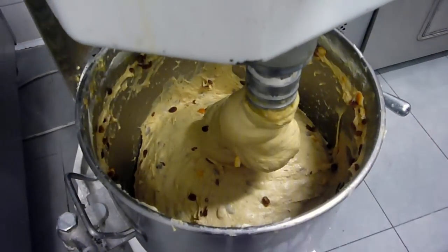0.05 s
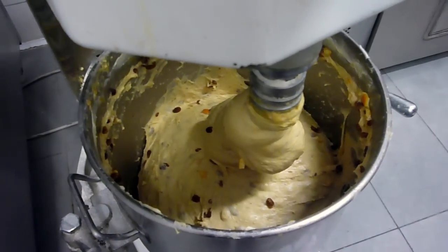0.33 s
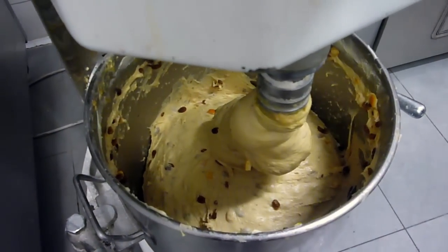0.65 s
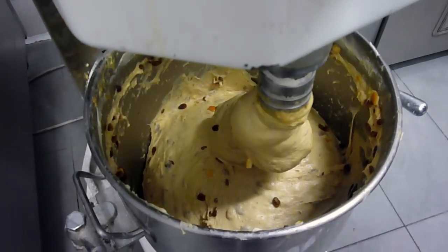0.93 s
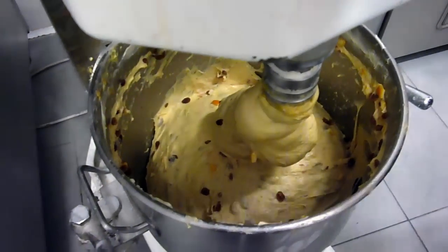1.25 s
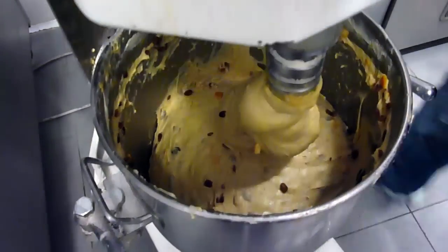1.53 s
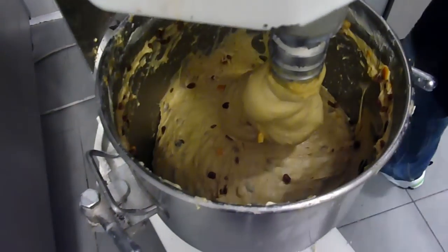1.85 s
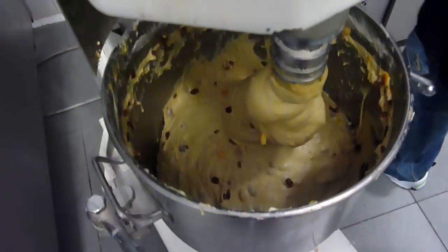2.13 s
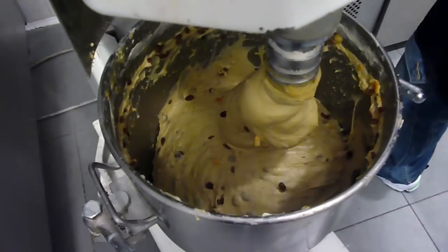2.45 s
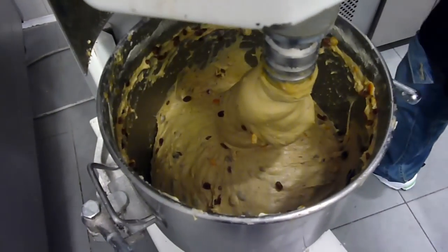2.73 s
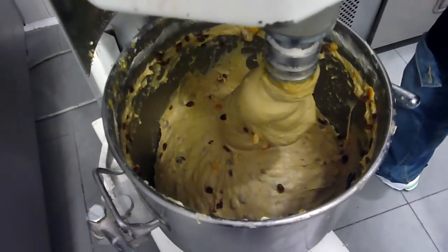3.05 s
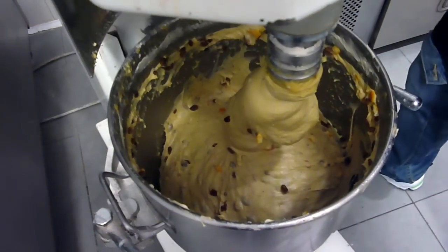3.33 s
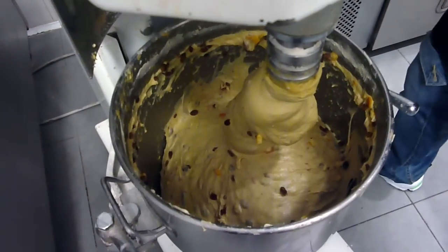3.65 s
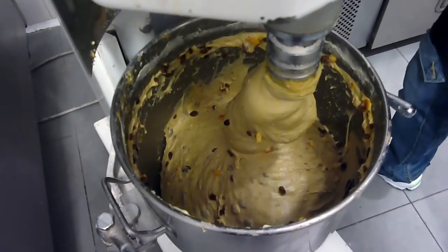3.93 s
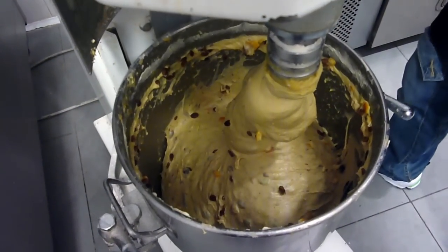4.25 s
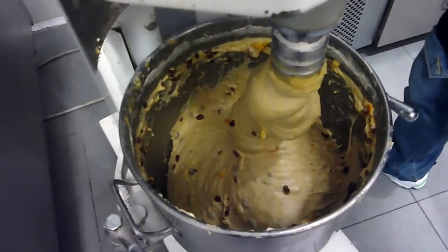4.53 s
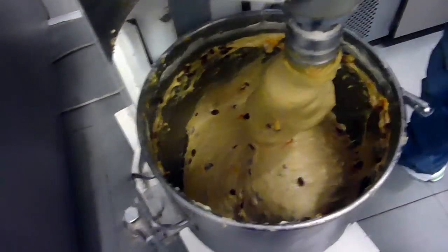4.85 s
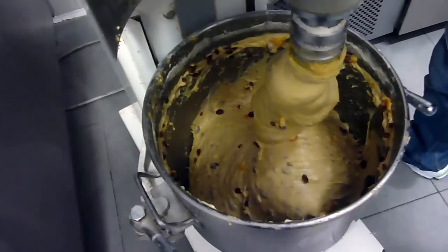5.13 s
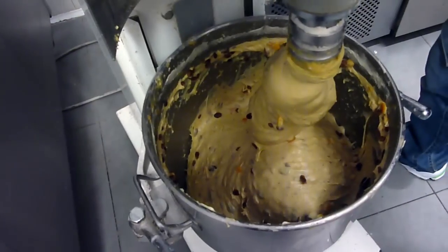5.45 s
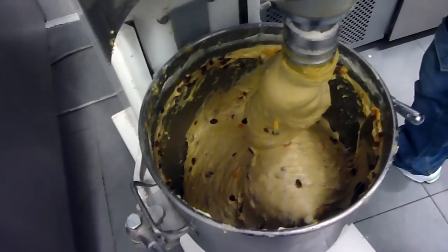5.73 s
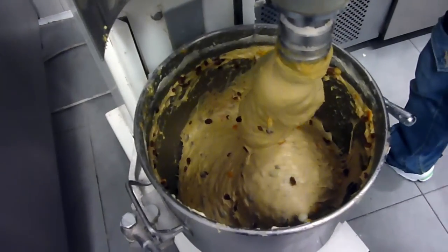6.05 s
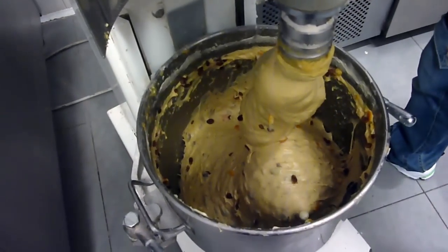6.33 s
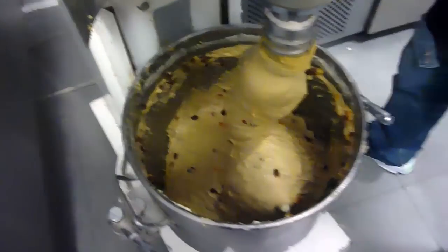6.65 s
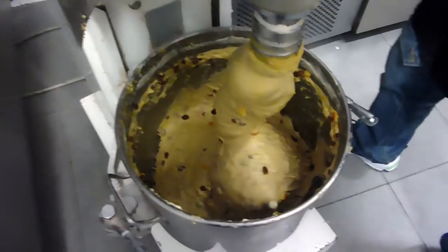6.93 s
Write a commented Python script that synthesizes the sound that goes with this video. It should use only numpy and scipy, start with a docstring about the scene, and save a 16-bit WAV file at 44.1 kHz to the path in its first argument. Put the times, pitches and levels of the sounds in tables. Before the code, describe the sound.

Shoes scuff over a cooler's hum, then a switch clacks and a large dough mixer rumbles, its steel bowl knocking and chattering.

```python
"""Dough mixer in a bakery

Shoes scuff over the hum of a cooler in a tiled kitchen, then a switch clacks and a large mixer starts.
Its gears shake the frame and the steel bowl, its shaft rattles, and blisters burst in the dough.
Under the load of the dough the bowl chatters in its mount, falls quiet for half a second
as the load lets go, and chatters again."""
import sys
import numpy as np
from scipy import signal
from scipy.fft import rfft, irfft
from scipy.io import wavfile
from scipy.ndimage import uniform_filter1d, map_coordinates

SR = 44100
rng = np.random.default_rng(int(sys.argv[2]) if len(sys.argv) > 2 else 0)


def waveform_to_disk(signal):
    """Save audio, clipped to [-1, 1], as 16-bit WAV at the path in sys.argv[1]."""
    frames = np.transpose(np.atleast_2d(signal))
    scaled = np.clip(frames, -1, 1) * 32767
    samples = np.round(scaled).astype(np.int16)
    wavfile.write(sys.argv[1], SR, samples)


N = 317079
T = np.arange(N) / SR
START_S, TURN_S = 1.646, 0.159  # when the mixer starts; how long one turn of its shaft takes

# how hard the drive works against the dough: time_s, level_db
EFFORT = [(1.68, -23), (2.2, -24.5), (2.34, -31), (2.48, -25.5), (2.98, -24), (3.3, -26), (3.75, -25.5),
          (4.16, -23), (4.37, -33), (4.56, -27), (4.82, -15.5), (4.93, -25.5), (5.03, -21), (5.58, -25),
          (5.76, -43), (6.17, -35.5), (6.28, -24), (7.13, -26.5), (7.19, -32.5)]
# how loud the frame rumbles: time_s, level_db
RUMBLE_LEVELS = [(1.68, -15.5), (2.24, -17.5), (2.34, -20.5), (2.75, -20), (2.97, -17.5), (3.33, -19),
                 (3.6, -18), (4.17, -17.5), (4.37, -28.5), (4.6, -19), (4.84, -14.5), (4.93, -23),
                 (5.1, -18), (5.35, -22.5), (5.5, -16.5), (5.78, -40), (6.17, -28.5), (6.27, -21),
                 (6.55, -22.5), (6.92, -17), (7.19, -22)]
# how loud the deep thrum is: time_s, level_db
THRUM_LEVELS = [(1.68, -14.5), (1.9, -30), (2.12, -21.5), (2.3, -29), (2.45, -23.5), (3.15, -28.5),
                (3.45, -24), (3.67, -14.5), (4.35, -25), (4.52, -17), (4.95, -22), (5.62, -22), (5.74, -48),
                (6.0, -34.5), (6.17, -37.5), (6.28, -23), (7.19, -23)]
# how hard the floor shakes: time_s, level_db
SHAKE_LEVELS = [(1.65, -61), (2.7, -46), (3.4, -41.5), (3.62, -33), (4.0, -46), (4.65, -42), (5.75, -61.5),
                (6.1, -47), (7.19, -55)]
# how loud the bearings whine: time_s, level_db
WHINE_LEVELS = [(1.65, -53), (2.05, -54), (3.4, -53), (3.9, -66), (5.8, -72), (7.19, -61)]
# the notes the frame rings at, called its modes: pitch_hz, width_hz, gain_db
FRAME_MODES = [(253.6, 5.6, -2), (273.7, 9.4, 0.5), (295.1, 10.6, -3), (333.3, 12.2, -5), (379.6, 23, -9.5)]
# the notes of the deep thrum: pitch_hz, width_hz, gain_db
THRUM_MODES = [(101.5, 16, -15.5), (138.5, 24, -10.5), (188.8, 6.3, 2), (226, 13.6, -5.5)]
# the notes of the bowl's wall: pitch_hz, width_hz, gain_db
BOWL_MODES = [(436.6, 27, 0.5), (526, 46, -4), (598.7, 22.8, 4), (676, 46, 1), (764, 73, -4),
              (887, 123, -7.5)]
# the notes of the bowl's rim: pitch_hz, width_hz, gain_db
RIM_MODES = [(1030, 36, -6.5), (1153, 53, -4.5), (1224, 24, -3.5), (1310, 25, -6)]
# moments when the rim sings out: start_s, level_db, rise_s, decay_s
RIM_SWELLS = [(1.88, -26, 0.035, 0.099), (3.5, -27.5, 0.076, .1), (3.945, -25.5, 0.03, 0.053),
              (5.85, -40.5, 0.22, 0.39)]
# the floor's tone colour, or how strong its lows and highs are: pitch_hz, level_db
SHAKE_COLOUR = [(20, -18.5), (42, -6), (57, 8), (80, 7.5), (120, -12), (250, -54), (1000, -96)]
# the hum of the gears: pitch_hz, level_db
GEAR_TONES = [(188.6, -15), (269.2, -2.5), (613.7, -27.5), (899, -19), (1174, -18)]
# the whine of the bearings: pitch_hz, level_db
BEARING_TONES = [(3461, -9.5), (4097, -10), (4145, 4), (4290, -11.5), (4829, -19.5), (6140, -11.5)]

# how loud the bowl grinds in its mount: time_s, level_db
GRIND_LEVELS = [(1.68, -27), (1.85, -34.5), (2.2, -35), (2.32, -42), (2.6, -37.5), (3.8, -38.5),
                (4.17, -33), (4.36, -44), (4.82, -28), (4.93, -34.5), (5.08, -29), (5.6, -30), (5.79, -57),
                (6.19, -47), (6.29, -27.5), (6.37, -32.5), (6.5, -28), (7.11, -28), (7.19, -37.5)]
# tone colour of the grinding: pitch_hz, level_db
GRIND_COLOUR = [(100, -12.5), (300, -1.5), (700, 2), (1000, 0), (1500, 2), (1900, -3.5), (2600, -8),
                (3500, -11.5), (4200, -23), (6500, -30.5), (8000, -47.5), (9700, -47), (11000, -71.5)]
# runs of knocks as the bowl slips: first_s, last_s, count, first_db, last_db
SLIP_RUNS = [(3.547, 3.621, 3, -23, -42), (3.7286, 3.871, 2, -20, -23), (3.957, 3.982, 2, -16.5, -22.5),
             (4.023, 4.203, 6, -22, -24.5), (4.48, 4.59, 4, -29, -20.5), (4.684, 4.861, 3, -21, -16.5),
             (4.98, 5.179, 6, -15, -16.5), (5.252, 5.475, 5, -15, -17), (5.499, 5.578, 2, -16, -13.5),
             (6.252, 6.282, 2, -24.5, -14.5), (6.421, 6.482, 2, -12, -14.5), (6.52, 6.808, 8, -11.5, -25),
             (6.893, 7.089, 6, -11.5, -21.5)]
# tone colour of a knock: pitch_hz, level_db
KNOCK_COLOUR = [(120, -23.5), (280, 16.5), (450, 11), (700, -1.5), (1400, 3.5), (2600, 6.5), (3600, -7),
                (4400, -8.5), (6500, -19.5), (8000, -44.5), (9700, -43), (11000, -50)]
# the notes of the bowl's mount: pitch_hz, width_hz, gain_db
MOUNT_MODES = [(705, 66, 7), (1197, 28, 11.5), (1290, 76, 2), (1567, 68, 9.5), (1790, 23, -5),
               (2500, 81, -14.5), (2400, 22, -14), (3300, 43, -23.5), (3366, 150, 0.5), (4100, 53, -21),
               (4760, 48, -6.5)]
# sideways thumps of the frame: start_s, level_db
THUMPS = [(2.094, -20), (2.26, -10.5), (2.413, -18), (2.48, -20), (2.963, -19), (3.011, -20), (3.282, -24),
          (3.425, -12), (3.622, -14.5), (4.026, -6), (4.477, -6)]
# how loud the shaft rattles as it slides in its guide: time_s, level_db
RATTLE_LEVELS = [(1.65, -35.5), (2.35, -53), (2.6, -47.5), (3.6, -43), (3.8, -62.5), (5.1, -44.5),
                 (5.55, -52), (5.8, -80), (6.15, -66), (6.4, -52)]
# the notes of the shaft: pitch_hz, width_hz, gain_db
SHAFT_MODES = [(2500, 130, -1), (3370, 230, 5), (4250, 200, 2.5), (4650, 200, 0.5), (5220, 540, -1.5),
               (6030, 180, -3.5), (6620, 360, -11), (9700, 1200, -33)]
# ticks and squeaks of steel parts: start_s, level_db, pitch_hz, decay_s
PINGS = [(1.656, -30, 4970, 0.0095), (2.125, -35.5, 3850, 0.038), (2.156, -34, 3880, 0.025),
         (2.148, -45, 6900, 0.029), (3.44, -42, 4600, 0.21), (3.548, -35, 5060, 0.025),
         (3.586, -30.5, 4420, 0.0064), (3.619, -33, 3340, 0.045), (3.657, -39, 5250, 0.0093),
         (6.016, -45.5, 3440, 0.052), (6.037, -48, 5030, 0.013)]
# blisters bursting in the dough: start_s, level_db
BLISTERS = [(3.7354, -37.5), (3.8437, -34.5), (3.8811, -33.5), (4.3131, -38), (4.4468, -42),
            (4.4807, -43.5), (4.5151, -35), (4.587, -35), (4.8708, -42), (5.022, -30), (5.1074, -35),
            (5.2544, -38), (5.4749, -39), (5.5807, -46)]
# tone colour of a bursting blister: pitch_hz, level_db
BLISTER_COLOUR = [(1000, -33.5), (2500, -8), (4500, 4), (6500, 1.5), (8000, -13), (9700, -18),
                  (11000, -43.5)]

# the switch closes, then the gears catch: start_s, snap_db, thud_db
CLACKS = [(1.653, -3, -10), (1.685, -11, -19)]
# the notes of the switch's case: pitch_hz, width_hz, gain_db
SWITCH_MODES = [(453, 68, -8), (670, 58, 8), (1150, 150, -16), (1470, 240, -6), (2620, 330, -9.5),
                (3390, 180, -3), (4830, 280, -7.5), (5200, 380, -8.5)]
# tone colour of the starting thud: pitch_hz, level_db
THUD_COLOUR = [(25, -19), (90, -17), (175, 4), (450, 7), (1200, -11.5), (3000, -24), (8000, -71)]
# soles dragging on the tiles: start_s, level_db, rise_s, decay_s, pitch_hz
SCUFFS = [(0.443, -24.5, 0.031, 0.081, 2370), (0.861, -17, 0.0013, 0.0053, 1130),
          (0.868, -23, 0.0074, 0.049, 1400), (1.04, -40.5, 0.018, 0.14, 7000),
          (1.181, -22.5, 0.029, 0.07, 1750), (1.489, -25.5, 0.031, 0.064, 2780),
          (1.541, -31.5, 0.039, 0.023, 3180)]
# tone colour of the grit under the soles: pitch_hz, level_db
GRIT_COLOUR = [(300, -4), (700, -3.5), (1500, -4), (3000, -7.5), (5000, -9), (6500, -9), (8000, -21),
               (9700, -22), (11000, -45.5)]
# heels landing: start_s, level_db, decay_s
HEELS = [(0.482, -26.5, 0.13), (0.635, -29.5, 0.05), (0.86, -13.5, 0.0021), (0.869, -27, 0.017),
         (1.2, -33, 0.036), (1.39, -31.5, 0.067)]
# tone colour of a heel: pitch_hz, level_db
HEEL_COLOUR = [(80, -26), (170, -9.5), (320, 5), (550, 1.5), (900, 1), (2000, -36), (8000, -68)]
# how loud the room's background hum and hiss are heard; they sink once the mixer runs: time_s, level_db
BACKGROUND_LEVELS = [(0, -1), (.5, -1), (1.63, 1.5), (1.72, -5.5), (4.3, -13.5), (6.1, -17.5),
                     (7.19, -10.5)]
# tone colour of the air in the room: pitch_hz, level_db
AIR_COLOUR = [(25, -21.5), (70, -18.5), (110, -9), (170, -13), (400, -7), (650, -12.5), (1100, -15.5),
              (1900, -18), (3400, -24), (4800, -26.5), (6400, -30.5), (8000, -45.5), (9700, -48),
              (11000, -70)]
# the notes of the cooler's fan duct: pitch_hz, width_hz, gain_db
DUCT_MODES = [(106, 6, -3.5), (165, 8.2, 4.5), (206, 21, 0), (315, 59, -5), (399, 17, -3), (452, 37, -10),
              (515.4, 23, 1.5), (1847, 25, -9.5), (3404, 81, -11.5)]
# the hum of the cooler's compressor: pitch_hz, level_db
COOLER_TONES = [(100.8, -37.5), (520, -53.5), (543, -43)]


def drive(slips):
    """Gear teeth knock the frame and bowl into ringing; the floor shakes, gears hum, bearings whine."""
    effort_db = curve(EFFORT)
    effort_db -= effort_db[T > START_S].mean()
    easing_db = T[T > START_S].mean() - T  # the rim and the hum ease off by 1 dB a second
    # each slip or thump makes the ringing briefly louder
    jolts = np.minimum(swells([(s, 0) for s, db in slips + THUMPS], rise_s=0.003, decay_s=0.016), 1)
    surge = from_db(5.5 * (jolts - uniform_filter1d(jolts, size=4096)) + 0.24 * shaft_turn())
    throb_db = 0.7 * shaft_turn() + 1.06 * drift(per_s=20)
    teeth = grains(per_s=900, spread_db=2.5)
    frame = from_db(curve(RUMBLE_LEVELS) + throb_db) * steady(resonate(teeth, FRAME_MODES), span_s=0.045)
    thrum = from_db(curve(THRUM_LEVELS)) * steady(resonate(teeth, THRUM_MODES), span_s=0.11)
    bowl = from_db(-27 + effort_db) * steady(resonate(teeth, BOWL_MODES), span_s=0.042)
    singing = sum(from_db(db) * swell(s, rise_s, decay_s) for s, db, rise_s, decay_s in RIM_SWELLS)
    rim_level = np.hypot(from_db(-36 + effort_db + easing_db), singing)
    rim = rim_level * steady(resonate(teeth, RIM_MODES), span_s=0.3)
    shake = from_db(curve(SHAKE_LEVELS)) * steady(coloured(noise(), SHAKE_COLOUR), span_s=0.2)
    hum = tones(GEAR_TONES, wander=0.0037, flutter_db=2.5, flutter_per_s=9.8)
    hum *= from_db(-29.5 + 0.2 * effort_db + easing_db)
    whine = tones(BEARING_TONES, wander=0.00099, flutter_db=2.5, flutter_per_s=30)
    whine *= from_db(curve(WHINE_LEVELS))
    return surge * (frame + bowl + rim) + thrum + shake + hum + whine


def bowl_chatter(slips):
    """The loaded bowl grinds in its mount; each slip is a snap and a short burst of tiny hits."""
    rubbing = from_db(curve(GRIND_LEVELS) + 2 * drift(per_s=25)) * grains(per_s=3000, spread_db=-3.5)
    grinding = from_db(2.5) * coloured(rubbing, GRIND_COLOUR)
    bursts = swells(slips, rise_s=0.00082, decay_s=0.018) * grains(per_s=5000, spread_db=3.3)
    snaps = swells(slips, rise_s=0.00068, decay_s=0.0046) * noise()
    ringing = resonate(from_db(0.5) * snaps + bursts, MOUNT_MODES)
    crunch = coloured(from_db(-7) * bursts + from_db(-9) * snaps, KNOCK_COLOUR)
    return kitchen(grinding + crunch + ringing, echo_db=-8)


def bowl_slips(uneven_db=1.8):
    """The bowl slips at even steps within a run, a bit uneven in strength; lists start_s, level_db."""
    runs = [np.linspace((first_s, first_db), (last_s, last_db), count)
            for first_s, last_s, count, first_db, last_db in SLIP_RUNS]
    return [(s, db + uneven_db * rng.standard_normal()) for s, db in np.vstack(runs)]


def frame_thumps():
    """Each thump is a brief push that sets the frame and the bowl's wall ringing."""
    pushes = swells(THUMPS, rise_s=0.00063, decay_s=0.011)
    frame = from_db(27) * resonate(pushes * noise(), FRAME_MODES)
    bowl = from_db(4.5) * resonate(pushes * noise(), BOWL_MODES)
    return frame + bowl


def shaft():
    """Steel slides on steel: a fine rattle that swells with each turn, plus a few ticks and squeaks."""
    rattle = unit_level(resonate(grains(per_s=1100, spread_db=2), SHAFT_MODES))
    rattle *= from_db(curve(RATTLE_LEVELS) + 0.5 * shaft_turn())
    # while the dough is light, the shaft ticks once a turn (same columns as PINGS)
    ticks = [(2.478 + turn * TURN_S, -45, 5330, 0.03) for turn in range(7)]
    pings, hiss = np.zeros(N), noise()
    for s, db, hz, decay_s in PINGS + ticks:
        near = slice(int(s * SR), int(s * SR) + SR // 3)
        ring = unit_level(resonate(hiss[near], [(hz, 700, 0)]))
        pings[near] += from_db(db) * swell(s, 0.0015, decay_s)[near] * ring
    return rattle + pings


def shaft_turn(peak_s=2.98):
    """Swings between -1 and 1 once for each turn of the shaft."""
    return np.cos(2 * np.pi * (T - peak_s) / TURN_S)


def dough():
    """Stretched blisters burst with small bright ticks."""
    ticks = from_db(-3) * swells(BLISTERS, rise_s=0.0005, decay_s=0.0032)
    return kitchen(coloured(ticks * noise(), BLISTER_COLOUR), echo_db=-5)


def switch():
    """The switch snaps shut, ringing its case, and the gears jolt the frame."""
    snap = sum(from_db(snap_db) * swell(s, 0.00024, 0.0024) for s, snap_db, _ in CLACKS)
    jolt = sum(from_db(thud_db) * swell(s - 0.005, 0.0012, 0.016) for s, _, thud_db in CLACKS)
    case = from_db(12.5) * resonate(snap * noise(), SWITCH_MODES)
    case = signal.sosfilt(signal.butter(6, 5600, fs=SR, output="sos"), case)
    thud = coloured(jolt * grains(per_s=2100, spread_db=2), THUD_COLOUR)
    return kitchen(case + thud, echo_db=-29)


def shoes():
    """Soles drag over grit, some scuffs higher and some lower, and heels land softly."""
    grit = coloured(grains(per_s=9100, spread_db=2), GRIT_COLOUR)
    scuffs = np.zeros(N)
    for s, db, rise_s, decay_s, hz in SCUFFS:
        band = signal.butter(1, [hz / 2, min(hz * 2, SR / 3)], "band", fs=SR)
        scuffs += from_db(db) * swell(s, rise_s, decay_s) * unit_level(signal.lfilter(*band, grit))
    heels = sum(from_db(db) * swell(s, 0.0012, decay_s) for s, db, decay_s in HEELS)
    return kitchen(scuffs + coloured(heels * noise(), HEEL_COLOUR), echo_db=-6.5)


def cooler():
    """The cooler's fan blows air through a duct while its compressor hums."""
    air = from_db(-31.5) * coloured(noise(), AIR_COLOUR)
    duct = from_db(-34.5) * unit_level(resonate(noise(), DUCT_MODES))
    hum = tones(COOLER_TONES, wander=0.0019, flutter_db=2, flutter_per_s=9)
    return from_db(curve(BACKGROUND_LEVELS)) * (air + duct + hum)


def kitchen(x, echo_db, fade_s=0.55):
    """Tiled walls add a short echo that dies away at a rate of 60 dB in fade_s."""
    t = T[:SR // 2]
    tail = rng.standard_normal(len(t)) * from_db(-60 * t / fade_s) * (t > 0.005)
    return x + from_db(echo_db) * signal.fftconvolve(x, tail / np.linalg.norm(tail))[:N]


def resonate(x, modes):
    """Lets x ring at each mode's pitch; a narrower mode rings longer."""
    out = 0
    for k, (hz, width_hz, db) in enumerate(modes):
        fade = np.exp(-np.pi * width_hz / SR)
        feedback = [1, -2 * fade * np.cos(2 * np.pi * hz / SR), fade * fade]
        ring = signal.lfilter([1, 0, -1], feedback, x + 1e-18)
        out += (-1) ** k * from_db(db) * (1 - fade * fade) / 2 * ring
    edges_hz = [modes[0][0] * 0.7, modes[-1][0] * 1.35]  # trim the sound below and above the modes
    return signal.sosfilt(signal.butter(2, edges_hz, "band", fs=SR, output="sos"), out)


def coloured(x, colour, size=8192):
    """Gives x a tone colour; plain noise keeps its overall level."""
    hz, db = np.transpose(colour)
    log_hz = np.log(np.maximum(np.arange(size // 2 + 1) * SR / size, 1))
    gains = unit_level(from_db(np.interp(log_hz, np.log(hz), db)))
    # build the filter so that it never sounds ahead of a hit
    cepstrum = irfft(np.log(gains))
    cepstrum[1:size // 2] *= 2
    cepstrum[size // 2 + 1:] = 0
    return signal.oaconvolve(x, irfft(np.exp(rfft(cepstrum))))[:N]


def tones(notes, wander, flutter_db, flutter_per_s):
    """Pure tones that wander in pitch together; each flutters in level on its own."""
    clock_s = T + np.cumsum(wander * drift(per_s=4)) / SR
    out = np.zeros(N)
    for hz, db in notes:
        level = from_db(db + flutter_db * drift(flutter_per_s))
        out += level * np.sqrt(2) * np.sin(2 * np.pi * (hz * clock_s + rng.random()))
    return out


def grains(per_s, spread_db):
    """Tiny hits of uneven size at random moments."""
    sizes = from_db(spread_db * np.minimum(rng.exponential(1, N), 4)) * rng.choice([-1, 1], N)
    return unit_level(sizes * (rng.random(N) < per_s / SR))


def swell(start_s, rise_s, decay_s, length_s=1):
    """A level that climbs straight to 1, then dies away."""
    out = np.zeros(N)
    near = slice(int(start_s * SR), int(start_s * SR) + int(length_s * SR))
    t = T[near] - start_s
    out[near] = np.clip(t / rise_s, 0, 1) * np.exp(-np.maximum(t - rise_s, 0) / decay_s)
    return out


def swells(events, rise_s, decay_s):
    """Adds up one short swell for each row of start_s, level_db."""
    return sum(from_db(db) * swell(s, rise_s, decay_s, length_s=0.2) for s, db in events)


def steady(x, span_s):
    """Holds the slow level at 1 and keeps the fast wobble."""
    return x / np.sqrt(uniform_filter1d(x * x, int(span_s * SR)) + 1e-12)


def drift(per_s):
    """A smooth random wobble, about 1 in size."""
    coarse_s = T[::64]
    wobble = map_coordinates(rng.standard_normal(4096), [coarse_s * per_s * 2], order=3, mode="wrap")
    return np.interp(T, coarse_s, unit_level(wobble))


def curve(rows):
    """Joins rows of time_s, level_db with straight lines."""
    return np.interp(T, *np.transpose(rows))


def noise():
    """Plain hiss."""
    return rng.standard_normal(N)


def unit_level(x):
    """Scales x so that its average power is 1."""
    return x / np.sqrt(np.mean(x ** 2) + 1e-20)


def from_db(db):
    """Turns decibels into a number to multiply by."""
    return 10 ** (np.asarray(db) / 20)


def round_peaks(x, limit, hardness):
    """Bends the biggest swings so that they stay under the limit."""
    return x / (1 + np.abs(x / limit) ** hardness) ** (1 / hardness)


def scene():
    """The cooler and shoes, then the switch and the running mixer."""
    running = np.clip((T - START_S) / 0.0079, 0, 1)
    slips = bowl_slips()
    mixer = running * (drive(slips) + frame_thumps() + shaft() + bowl_chatter(slips) + dough())
    mixer = round_peaks(mixer, limit=0.7, hardness=4)
    return (cooler() + shoes() + switch() + mixer)[None, :]


def record(dry):
    """Rounds off the loudest peaks and cuts the highest treble."""
    treble_cut = signal.ellip(14, 0.2, 120, 10900, fs=SR, output="sos")
    return signal.sosfilt(treble_cut, round_peaks(dry, limit=0.92, hardness=6))


dry = scene()
out = record(dry)
waveform_to_disk(out)
```